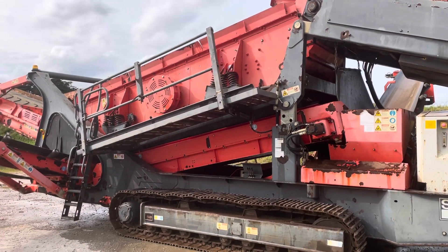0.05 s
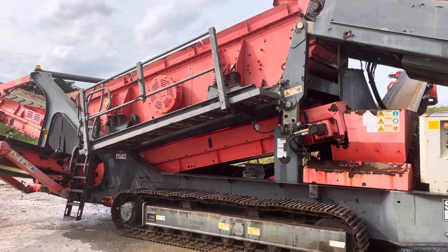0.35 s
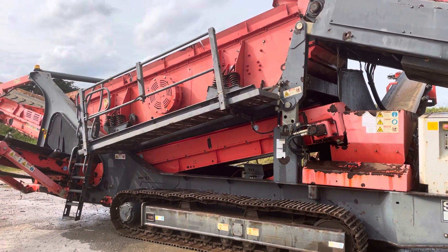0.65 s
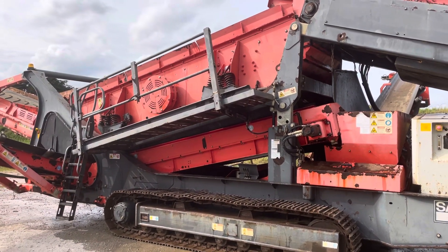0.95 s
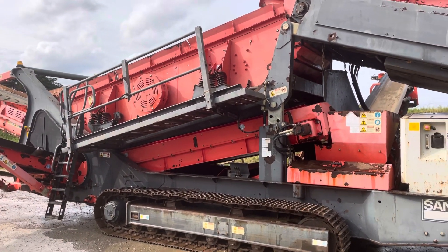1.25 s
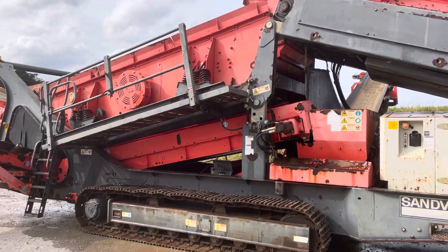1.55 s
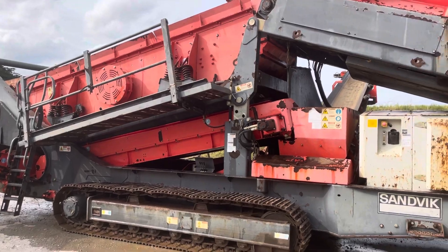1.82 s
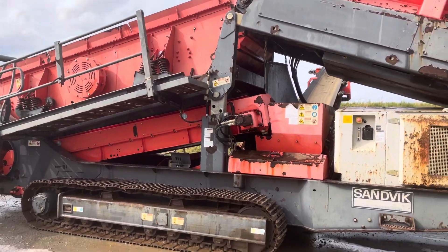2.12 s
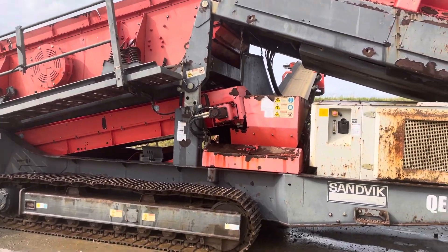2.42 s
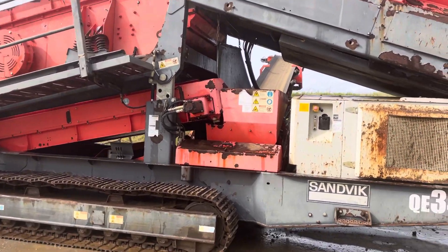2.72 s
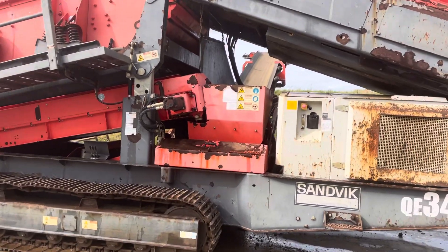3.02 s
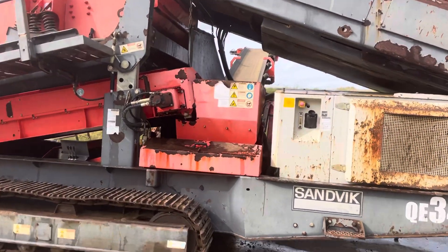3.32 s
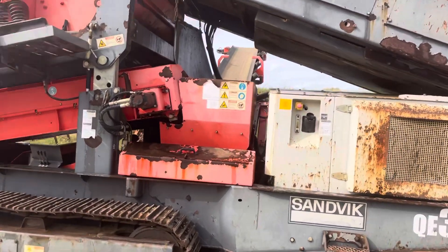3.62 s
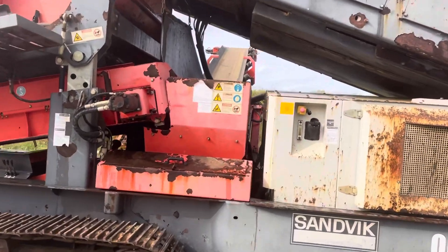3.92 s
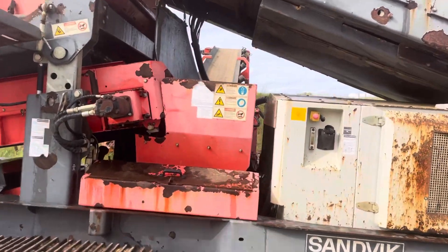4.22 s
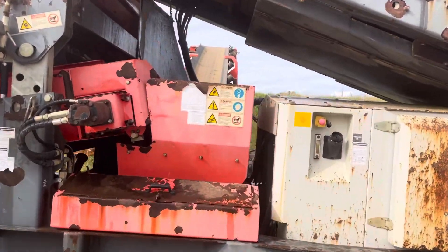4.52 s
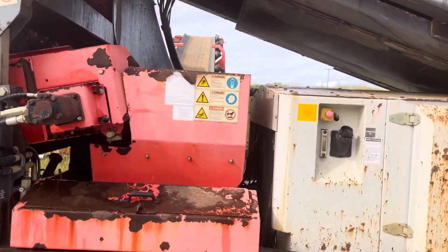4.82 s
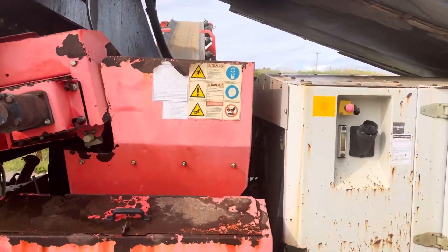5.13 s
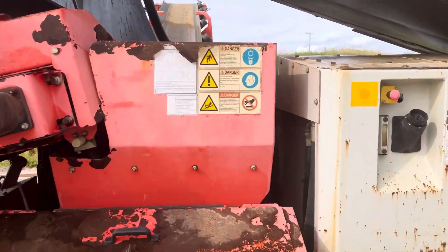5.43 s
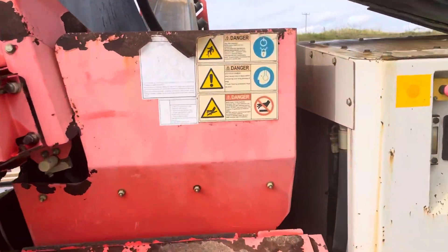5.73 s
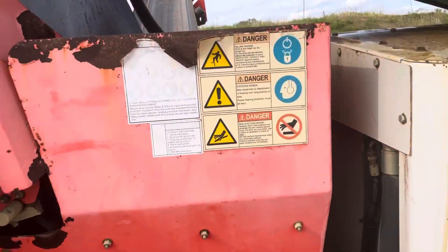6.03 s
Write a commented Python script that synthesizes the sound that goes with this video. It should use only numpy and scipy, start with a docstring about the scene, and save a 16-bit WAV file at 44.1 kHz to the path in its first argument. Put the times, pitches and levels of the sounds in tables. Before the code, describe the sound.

Faint machinery and high hiss swell into the loud, fast pulsing steel clatter and diesel rumble of a screening machine.

```python
"""Walking up to a tracked screening machine.

The shaker box clashes once per shaft turn, 17 times a second, over a diesel, a booming housing and a fan.
All but the top hiss is muted for two seconds, under a few puffs of wind, then swells to full strength.
On the approach the chassis shades the clatter, the rumble comes up and the strokes grow sharper."""
import sys
import numpy as np
from scipy import signal
from scipy.fft import rfft, irfft, next_fast_len
from scipy.io import wavfile
from scipy.ndimage import map_coordinates

SR = 44100
rng = np.random.default_rng(int(sys.argv[2]) if len(sys.argv) > 2 else 0)


def file_out(sig):
    """Save sig as 16-bit WAV at sys.argv[1]."""
    # one column per channel
    cols = np.atleast_2d(sig).T
    # limit, then scale
    lim = np.clip(cols, -1, 1)
    pcm = np.round(lim * 32767).astype(np.int16)
    wavfile.write(sys.argv[1], SR, pcm)


N = 267246

# shaker shaft speed: time_s, speed_hz
SHAFT_SPEED = [(0, 16.87), (.9, 16.895), (1.8, 16.935), (2.4, 16.915), (3.4, 16.925), (4.3, 16.96),
               (5.2, 16.905), (6.06, 16.94)]

TIME_S = np.arange(N) / SR
SHAFT_HZ = SHAFT_SPEED[0][1]
LIFT_S = 2.03  # muting ends
# stages of the walk: from_s, to_s
SHADE_S, APPROACH_S, UNDERSIDE_S, LAST_STEP_S = (2.9, 4), (3.65, 4.96), (3.62, 3.70), (5.6, 5.9)


def amp(db):
    """Decibels to gain."""
    return 10 ** (np.asarray(db) / 20)


def unit(x):
    """Scale to rms 1."""
    return x / np.sqrt(np.mean(x ** 2) + 1e-20)


def along(points, hz):
    """Read (freq_hz, value) points on a log axis."""
    f, v = np.transpose(points)
    return np.interp(np.log(hz + 1), np.log(f + 1), v)


def ramp(start_s, end_s):
    """Linear rise from 0 to 1."""
    return np.clip((TIME_S - start_s) / (end_s - start_s), 0, 1)


def swell(at_s, sigma_s):
    """Gaussian hump of height 1."""
    return np.exp(-.5 * ((TIME_S - at_s) / sigma_s) ** 2)


def wobble(rate_hz):
    """Smooth random curve, rate_hz knots a second."""
    knots = rng.standard_normal(int(N * rate_hz / SR) + 4)
    fine = np.arange(0, len(knots) - 1, .0625)
    return np.interp(TIME_S * rate_hz, fine, map_coordinates(knots, [fine]))


def tone(cycles, waver_db, waver_hz):
    """Sine of rms 1 with a wavering level."""
    return unit(np.sin(2 * np.pi * (cycles + rng.random())) * amp(waver_db * wobble(waver_hz)))


def filtered(x, response):
    """Apply a complex frequency response."""
    size = next_fast_len(N + SR // 2)
    return irfft(rfft(x, size) * response(np.fft.rfftfreq(size, 1 / SR)), size)[..., :N]


def resonances(modes, hz):
    """Causal response of (freq_hz, width_hz, level_db) modes."""
    return sum(amp(db) * 1j * hz * w / (f * f - hz * hz + 1j * hz * w) for f, w, db in modes)


def resonate(drive, modes, tilt):
    """Ring modes under a (freq_hz, gain_db) tilt; rms 1."""
    return unit(filtered(drive, lambda hz: resonances(modes, hz) * amp(along(tilt, hz))))


def spread(pair, spectrum, width=1):
    """Two unrelated signals to stereo of rms 1 with a (freq_hz, level_db) spectrum."""
    # left-right likeness: freq_hz, coherence
    likeness = [(200, .85), (600, .8), (1000, .7), (1600, .3), (2200, .62), (2900, .45), (3800, .78),
                (5000, .68), (6000, .9), (7500, 1)]

    def mid_side(hz):
        apart = hz ** 8 / (hz ** 8 + 180 ** 8)  # below about 180 Hz left and right are alike
        angle = apart * np.arccos(np.clip(along(likeness, hz), -1, 1)) / 2
        return amp(along(spectrum, hz)) * [np.cos(angle), np.sin(angle)]

    mid, side = filtered(pair, mid_side)
    return unit(np.array([mid + width * side, mid - width * side]))


def level(start_db, muted_db, open_db, beside_db, swell_s, lift_s=LIFT_S, change_s=SHADE_S):
    """Gain of a part: muted, swelling to full in the open, then changing beside the chassis."""
    quiet = amp(start_db + (muted_db - start_db) * ramp(0, .79))
    full = amp(open_db + (beside_db - open_db) * ramp(*change_s))
    return quiet + (full - quiet) * ramp(lift_s, lift_s + swell_s)


def last_step(share=1):
    """Gain from the last step toward the housing: a share of 2.5 dB."""
    return amp(share * 2.5 * ramp(*LAST_STEP_S))


def distance_m(far_m=5, walk_m_per_s=1.55):
    """Listener to housing."""
    walked_s = np.maximum(TIME_S - APPROACH_S[0], 0)
    return np.maximum(far_m - walk_m_per_s * walked_s, 1)


def bounce(x, lag_ms, share):
    """Add one reflection of varying lag and strength."""
    n = np.arange(N)
    echo = np.array([np.interp(n - lag_ms * SR / 1000, n, channel) for channel in x])
    return (x + share * echo) / np.sqrt(1 + share ** 2)


def ground_bounce(x):
    """A weak ground reflection sweeps a comb downward on the way in."""
    return bounce(x, lag_ms=3.6 / np.sqrt(distance_m()), share=.35 / distance_m())


def track_bounce(x):
    """In passing, the track frame's reflection sweeps a comb upward."""
    passing = ramp(3.2, 4.0)
    return bounce(x, lag_ms=np.interp(passing, [0, 1], (2.15, 1.05)), share=.33 * np.sin(np.pi * passing))


def shaft_turns():
    """Running count of shaker shaft turns."""
    return np.cumsum(np.interp(TIME_S, *np.transpose(SHAFT_SPEED))) / SR + .21


def stroke_db(turns):
    """Swing of the clash level through each turn."""
    # one stroke: phase_turns, level_db
    stroke = [(.025, -2.5), (.075, -1.5), (.17, 0), (.27, -0.75), (.43, -2.5), (.68, -4)]
    return np.interp(turns, *np.transpose(stroke), period=1)


def strike_clock(turns, phase_turns):
    """Index and age in seconds of a once-per-turn strike."""
    return np.floor(turns - phase_turns).astype(int), (turns - phase_turns) % 1 / SHAFT_HZ


def contacts(turns, repeat):
    """Two streams of small contacts; the power share `repeat` recurs on every turn."""
    turn_samples = round(SR / SHAFT_HZ)
    steps = 32 * turn_samples
    pattern = unit(irfft(np.exp(2j * np.pi * rng.random((2, turn_samples // 2 + 1))), steps))
    recurring = pattern[:, (turns * steps).astype(int) % steps]
    return np.sqrt(repeat) * recurring + np.sqrt(1 - repeat) * rng.standard_normal((2, N))


def steel(x, t60_s, wet_db):
    """Sheet steel adds a short, dense ring whose colour keeps changing."""
    t = np.arange(SR // 16) / SR
    hop = SR // 3
    out = np.pad(x, ((0, 0), (hop, 3 * hop)))
    dry, fade = out.copy(), np.hanning(2 * hop)
    for start in range(0, N + hop, hop):
        tail = rng.standard_normal(len(t)) * amp(-60 * t / t60_s)
        block = dry[:, start:start + 2 * hop] * fade
        rung = signal.fftconvolve(block, tail[None] / np.linalg.norm(tail), axes=1)
        out[:, start:start + rung.shape[1]] += amp(wet_db) * rung
    return out[:, hop:hop + N]


def clatter(turns, swing_db, spectrum, repeat, width=1):
    """Pulsing contacts ring through sheet steel; rms 1."""
    hits = contacts(turns, repeat) * amp(swing_db + 1.2 * wobble(90))
    return spread(steel(hits, t60_s=.03, wet_db=-11), spectrum, width)


def wind():
    """Soft puffs rumble on the microphone."""
    # puffs: time_s, sigma_s, level_db
    puffs = [(0.288, 0.11, -36.5), (0.633, 0.11, -39.5), (1.05, 0.12, -45), (1.43, 0.1, -43)]
    spectrum = [(20, -2), (50, 10), (110, 6), (170, 2), (240, -3), (420, -4.5), (900, -57)]
    envelope = sum(amp(db) * swell(at_s, sigma_s) for at_s, sigma_s, db in puffs)
    return envelope * spread(rng.standard_normal((2, N)), spectrum, width=0)


def rush():
    """A brief midrange rush dies away at the start."""
    # rush noise: freq_hz, level_db
    spectrum = [(400, -28), (700, -4), (950, 2), (1300, -3), (2000, -25)]
    return amp(-47) * swell(.08, .17) * spread(rng.standard_normal((2, N)), spectrum)


def blows(events, t60_s, spectrum):
    """One dying noise burst per (time_s, level_db) event."""
    envelope = sum(amp(db - 60 * np.abs(TIME_S - s) / t60_s) * (TIME_S >= s) for s, db in events)
    return envelope * spread(rng.standard_normal((2, N)), spectrum, width=0)


def loose_parts():
    """Loose fittings clink; the frame gives dull knocks."""
    # metal clinks: time_s, relative_db
    clink_events = [(1.6033, -14), (2.5394, -25), (2.5955, -27), (3.0674, -10)]
    # frame knocks: time_s, relative_db
    knock_events = [(2.934, 0), (4.197, -9)]
    clinks = blows(clink_events, t60_s=.065, spectrum=[(1500, -25), (4000, -27), (9000, 25), (15000, -3)])
    knocks = blows(knock_events, t60_s=.03, spectrum=[(30, -9), (80, 20), (300, -13), (900, -32)])
    return amp(-13.5) * clinks + amp(-15) * knocks


def engine(firings, near_db):
    """Firing note, exhaust pipe resonance and broad rumble."""
    # exhaust pipe: freq_hz, width_hz, level_db
    pipe_modes = [(124.2, 31, 0)]
    # engine rumble: freq_hz, level_db
    spectrum = [(15, -40), (28, -22), (42, -4), (53, 4.5), (68, 1), (88, 5), (120, 1.5), (152, -28),
                (220, -114), (500, -110)]
    note = amp(.38 * near_db - 2) * tone(firings, waver_db=1.3, waver_hz=6)
    exhaust = unit(filtered(rng.standard_normal(N), lambda hz: resonances(pipe_modes, hz) ** 2))
    rumble = amp(-5 - .5 * near_db + .36 * wobble(9)) * spread(rng.standard_normal((2, N)), spectrum)
    gain = level(-48, -47.5, -33.5, -24.8, swell_s=1.26, change_s=UNDERSIDE_S)
    return gain * (note + amp(near_db - 4) * exhaust + rumble)


def housing_boom():
    """The housing panels boom; close by, each ear hears a different one."""
    # housing panels: freq_hz, width_hz, level_db
    modes = [(190.7, 28, 0), (208, 17, 1.5), (248, 50, -1.5), (303, 22, -40)]
    tilt = [(90, -2), (165, 2), (340, -3), (600, -4.5)]
    mid, side = resonate(rng.standard_normal((2, N)), modes, tilt)
    return mid + amp(-6) * ramp(*LAST_STEP_S) * np.array([side, -side])


def diesel(turns, firing_hz=70.5, fan_hz=230.3):
    """The engine fires beside its humming fan; engine and shaker both drive the housing panels."""
    firings = firing_hz * TIME_S + .063 * wobble(4.95)
    near_db = 9 * (ramp(*UNDERSIDE_S) - 1)  # tones and exhaust stand out only close by
    afar = 1 - ramp(*APPROACH_S)
    rumble = engine(firings, near_db)
    boom = amp(.082 * near_db - 1) * housing_boom()
    hum = amp(-11) * tone(3 * firings, waver_db=4, waver_hz=11)  # on the main panel resonance
    fan = amp(near_db - 5.5) * tone(fan_hz * TIME_S + .06 * wobble(6), waver_db=2.5, waver_hz=5)
    driven = amp(-6) * tone(12 * turns, waver_db=1, waver_hz=5)
    driven += amp(-13) * tone(16 * turns, waver_db=2, waver_hz=5)
    driven *= afar * ramp(LIFT_S, LIFT_S + .1)
    throb = amp(1.6 * afar * np.cos(np.pi * (turns - .13)))  # every second turn
    gain = level(-46, -47.5, -22.5, -22, swell_s=.52) * last_step()
    return rumble + gain * (throb * (boom + driven) + hum + fan)


def loose_panel(turns):
    """A loose panel chatters unevenly."""
    # panel chatter: freq_hz, level_db
    spectrum = [(700, -42), (1050, 3), (1500, 1), (2300, 2), (3200, -8), (5000, -27), (7000, -50)]
    chatter = contacts(turns, repeat=.2) * amp(3 * wobble(130) + 2 * wobble(500))
    return spread(chatter, spectrum)


def guard(turns):
    """A light steel guard, shaken all through the turn, drones."""
    # guard: freq_hz, width_hz, level_db
    modes = [(568, 23, 0), (656, 110, -1.5)]
    shakes = contacts(turns, repeat=.13)[0] * amp(.18 * stroke_db(turns))
    drone = resonate(shakes, modes, tilt=[(300, -32), (600, -10), (1200, -18)])
    return level(-51, -66, -37, -35, swell_s=1, lift_s=1.8) * drone


def bracket(turns, pitch_hz=926, t60_s=.07, attack_s=.005):
    """Each stroke strikes a steel bracket; its one note dies before the next."""
    index, age_s = strike_clock(turns, phase_turns=.07)
    size, detune, phase = rng.standard_normal((index[-1] + 1, 3))[index].T
    note = np.sin(2 * np.pi * pitch_hz * (1 + .02 * detune) * age_s + 1.1 * phase)
    envelope = amp(1.7 * size - 60 * age_s / t60_s) * (1 - np.exp(-(age_s / attack_s) ** 2))
    return level(-60, -64, -30.5, -34, swell_s=1.15) * unit(note * envelope)


def plates(turns):
    """Steel plates sing on multiples of the shaft speed."""
    # plate tones: shaft_multiple, open_db, beside_chassis_db
    partials = [(32, -10, -5), (34, -6, -9), (39, -4, -6), (42, -4, -6), (48, -6, -5), (50, -9, -6),
                (54, -9, -8), (57, -8, -7), (69, -11, -14), (82, -5, -10), (89, -7, -10), (110, -11, -13)]
    shade, swing_db = ramp(*SHADE_S), stroke_db(turns)
    singing = np.zeros(N)
    for multiple, open_db, beside_db in partials:
        gain = amp(open_db) * (1 - shade) + amp(beside_db) * shade
        depth = 1.1 if multiple > 45 else .3  # lighter plates follow the strokes more closely
        singing += gain * amp(depth * swing_db) * tone(multiple * turns, waver_db=2.5, waver_hz=7)
    return singing


def deck_ring(turns):
    """The crest of each stroke rings the deck."""
    # deck: freq_hz, width_hz, level_db
    modes = [(940, 76, -3), (1380, 26, -2), (1514, 27, -2)]
    strikes = contacts(turns, repeat=.5)[0] * amp(3 * stroke_db(turns))
    ring = resonate(strikes, modes, tilt=[(400, -22), (850, -1), (1650, 1), (3000, -23)])
    return level(-51, -50.5, -25, -31.5, swell_s=.5) * amp(-2) * ring


def top_hiss(turns, clash_db):
    """A high hiss pulses with the strokes, never muted."""
    # hiss: freq_hz, level_db
    spectrum = [(6000, -86), (7400, -20.5), (8000, -3.5), (9300, -3), (10000, -7.5), (10600, -10.5),
                (12000, -14), (13300, -23), (15000, -15.5), (16000, -40)]
    return amp(-35.5 + .81 * wobble(18)) * clatter(turns, .99 * clash_db, spectrum, repeat=.027)


def impacts(turns, t60_s=.024, scatter_db=1.4):
    """Three steel-on-steel cracks open each stroke; the first stands out beside the housing."""
    # hard contacts: phase_turns, far_db, near_db
    hits = [(.05, -6, 5.5), (.11, -2, -2), (.165, 2, 3)]
    # crack: freq_hz, level_db
    spectrum = [(700, -45), (1400, -4), (2600, 2), (3600, 2), (5000, 0), (7400, -25), (7900, -45),
                (9000, -90)]
    close = ramp(5.3, 5.8)
    envelope = np.zeros(N)
    for phase_turns, far_db, near_db in hits:
        index, age_s = strike_clock(turns, phase_turns)
        uneven_db = scatter_db * rng.standard_normal(index[-1] + 1)[index]
        envelope += amp(far_db + (near_db - far_db) * close + uneven_db - 60 * age_s / t60_s)
    return np.sqrt(np.mean(envelope ** 2)) * spread(envelope * contacts(turns, repeat=.51), spectrum)


def frame(turns, clash_db):
    """The heavy frame's low clatter starts nearly mono and spreads later, as the strokes pulse harder."""
    # frame, early: freq_hz, level_db
    early_spectrum = [(150, -48), (250, -6), (315, 5), (440, -2), (580, 3.5), (680, 2.5), (800, -3.5),
                      (1100, -44)]
    # frame, late: freq_hz, level_db
    late_spectrum = [(150, -92), (260, -1.5), (315, -5.5), (370, 0.5), (470, 4.5), (570, 1.5), (700, 3.5),
                     (800, -1), (1100, -50)]
    blend = ramp(*APPROACH_S)
    width = amp(67.7 * blend - 66.5)
    early = clatter(turns, .31 * clash_db, early_spectrum, repeat=.11, width=width)
    late = clatter(turns, .79 * clash_db, late_spectrum, repeat=.13, width=width)
    return np.sqrt(1 - blend) * early + np.sqrt(blend) * late


def deck(turns, clash_db):
    """The decks' midrange clash starts nearly mono and spreads in stereo later."""
    # deck clash: freq_hz, level_db
    spectrum = [(500, -84), (720, -14), (830, -1), (930, -3), (1080, 0), (1250, -1.5), (1430, -2.5),
                (1700, -6.5), (2300, -52)]
    width = amp(20 * ramp(*APPROACH_S) - 13)
    clash = clatter(turns, .96 * clash_db, spectrum, repeat=.36, width=width)
    return level(-41, -46.5, -22, -25, swell_s=.75) * amp(-2) * clash


def screen(turns, clash_db, wire_gain):
    """The light mesh and its wires clatter in the treble."""
    # mesh: freq_hz, level_db
    mesh_spectrum = [(1200, -43), (1730, -1.5), (1900, 1.5), (2400, -1.5), (2800, -5), (3400, -35),
                     (4500, -60)]
    # wires: freq_hz, level_db
    wire_spectrum = [(2000, -52), (2550, -2.5), (2900, -1.5), (3130, 1.5), (3550, -1), (3830, 0.5),
                     (4400, -3.5), (5000, -3.5), (6000, -7.5), (7500, -5.5), (7900, -29), (9000, -90)]
    mesh = amp(.65) * clatter(turns, .44 * clash_db, mesh_spectrum, repeat=.15)
    wires = amp(.33) * clatter(turns, clash_db, wire_spectrum, repeat=.13)
    mesh_gain = level(-48, -50.5, -25.5, -28.5, swell_s=1)
    return mesh_gain * mesh + wire_gain * last_step(.28) * wires


def shaker(turns):
    """Each turn throws the screen decks against their seats and shakes every steel part."""
    passing_panel = swell(3.55, .2)
    blur = 1 - .4 * passing_panel  # the loose panel blurs the strokes
    sharpness = blur * (.87 + 1.15 / distance_m())
    scatter_db = .3 * wobble(25) + .7 * wobble(450)  # a stroke is a cluster of hits
    clash_db = sharpness * (stroke_db(turns) + 1.5) + scatter_db
    frame_gain = level(-44.5, -50, -23, -22.5, swell_s=.63)
    wire_gain = level(-42.5, -45.5, -25, -28, swell_s=.75)
    clash = frame_gain * amp(-.4) * last_step(.64) * frame(turns, clash_db)
    clash += deck(turns, clash_db)
    clash += track_bounce(screen(turns, clash_db, wire_gain))
    clash += wire_gain * amp(3) * last_step(.4) * blur * impacts(turns)
    hiss = top_hiss(turns, clash_db)
    ringing = deck_ring(turns) + frame_gain * amp(-12.5) * plates(turns) + bracket(turns)
    ringing *= amp(3 * swell(3.14, .13))  # heard most directly here
    drone = guard(turns)
    rattle = amp(-31) * passing_panel * loose_panel(turns)
    return ground_bounce(clash + ringing + drone + rattle) + hiss


def scene():
    """The whole machine, with a little wind."""
    turns = shaft_turns()
    return shaker(turns) + diesel(turns) + loose_parts() + wind() + rush()


def record(dry):
    """Left and right differ in level and phase through the treble; the very top is cut off."""
    # level difference: freq_hz, left_minus_right_db
    balance = [(1300, 0.5), (1720, -1), (1900, 0), (2400, 1.5), (3000, 5.5), (3800, 2.5), (5000, 5),
               (6000, 0.5), (8000, 2.5)]
    # phase difference: freq_hz, left_lead_half_cycles
    lead = [(600, 0), (1400, .15), (2000, -.1), (2800, .13), (3800, .03), (5000, .16), (6200, -.08),
            (7000, -.45), (7700, -1), (8550, -1), (9400, -1.39), (10000, -1.64), (10500, -1.87),
            (11200, -2), (12900, -2), (13400, -2.55), (14000, -2.85), (15000, -2.97)]
    sides, top_hz = np.array([[.5], [-.5]]), 15730

    def response(hz):
        tilt_db = along(balance, hz) * (hz > 1000) * (hz < 7700)
        return amp(sides * tilt_db) * np.exp(1j * np.pi * sides * along(lead, hz)) * (hz < top_hz)

    return filtered(dry, response)


dry = scene()
out = record(dry)
file_out(out)
```